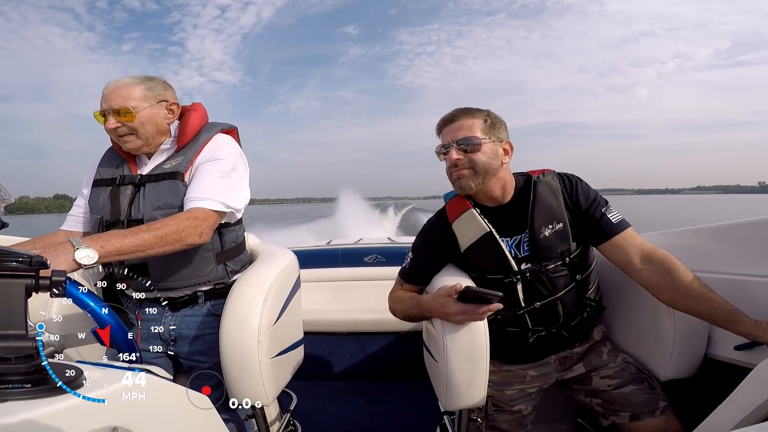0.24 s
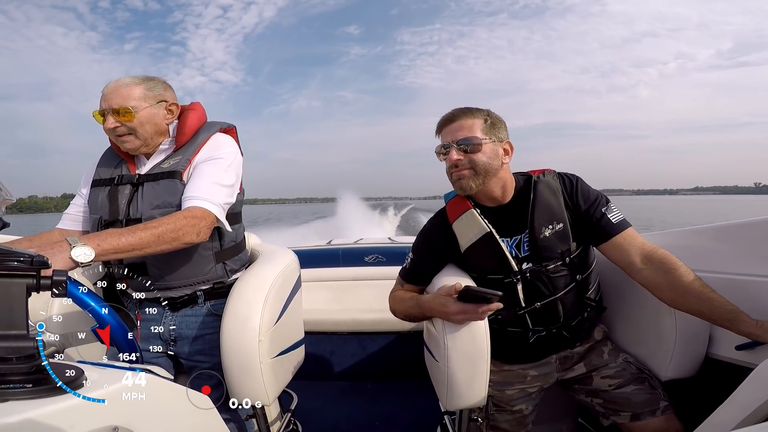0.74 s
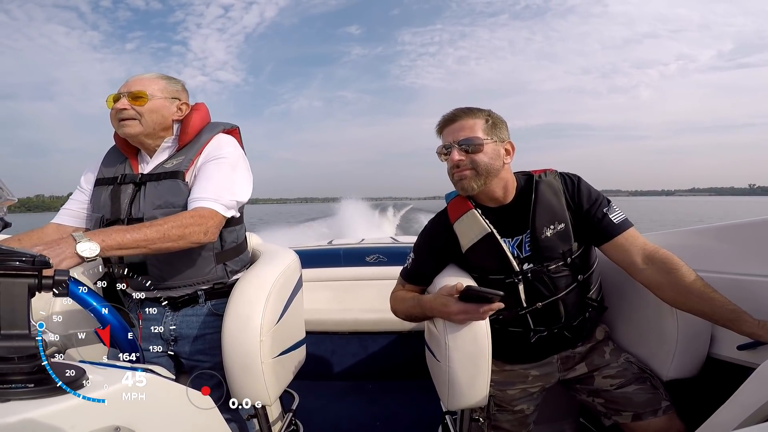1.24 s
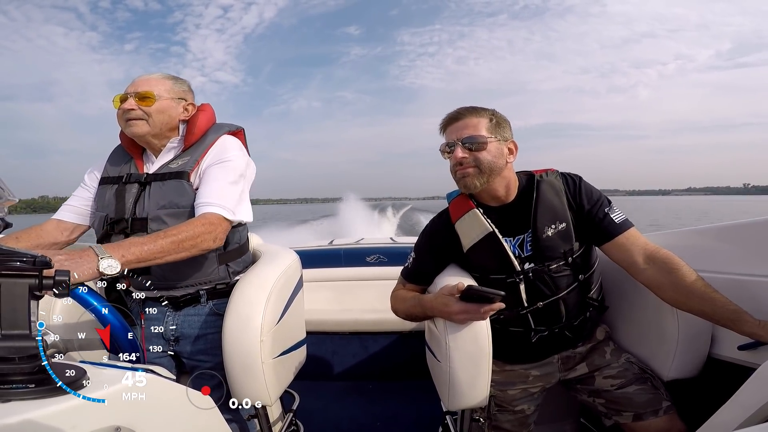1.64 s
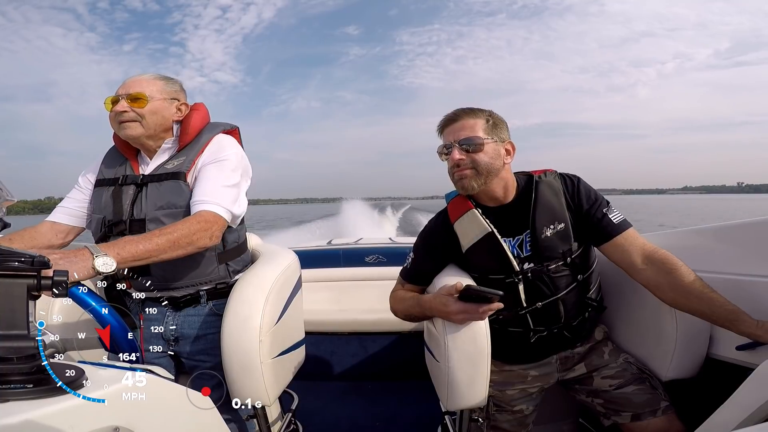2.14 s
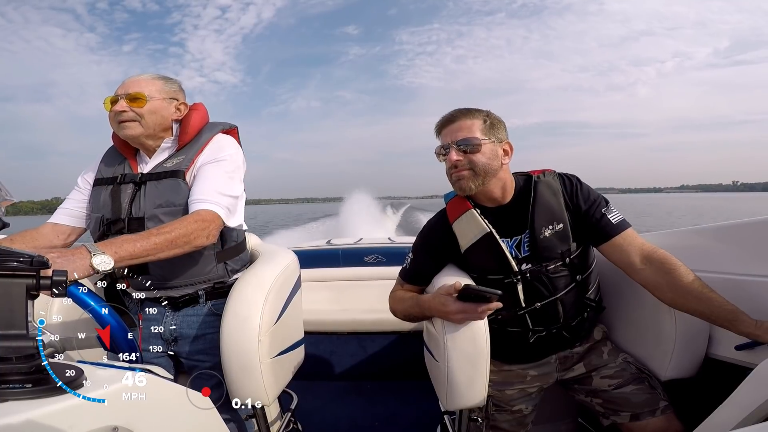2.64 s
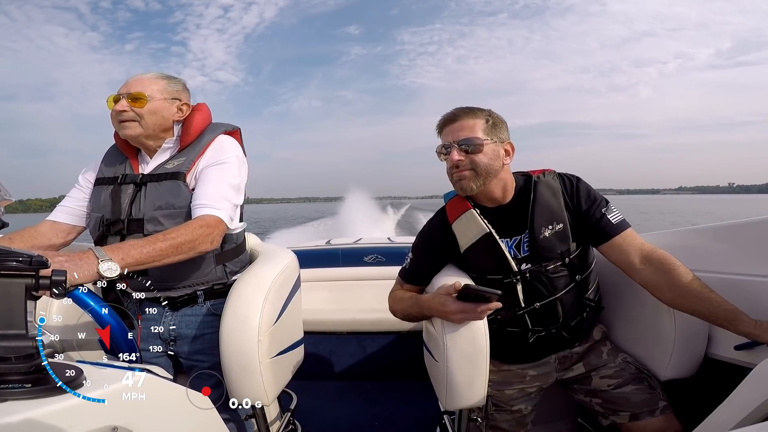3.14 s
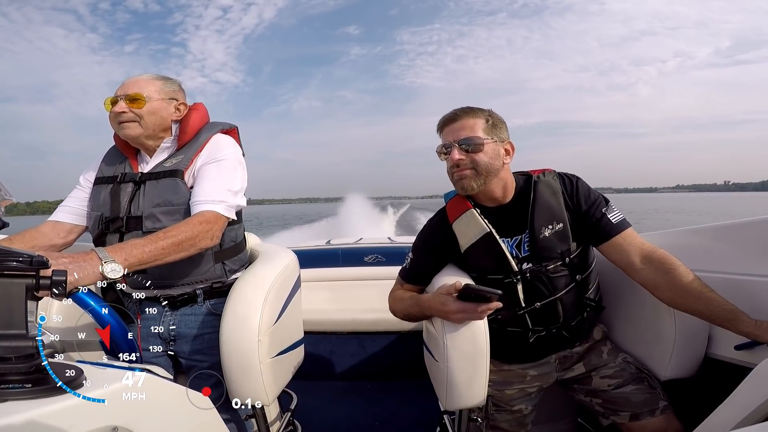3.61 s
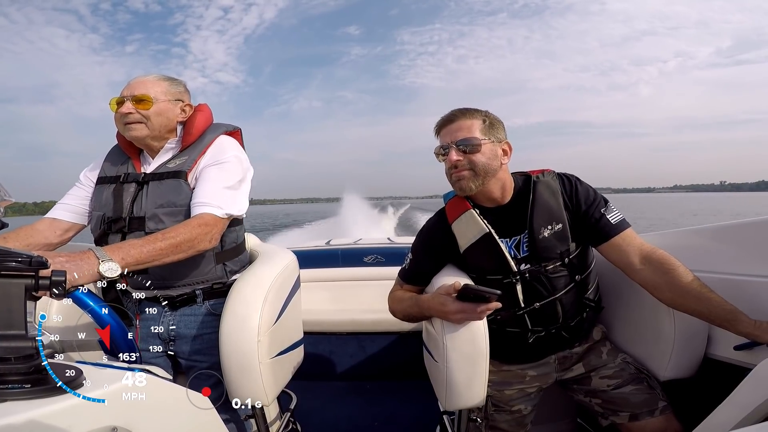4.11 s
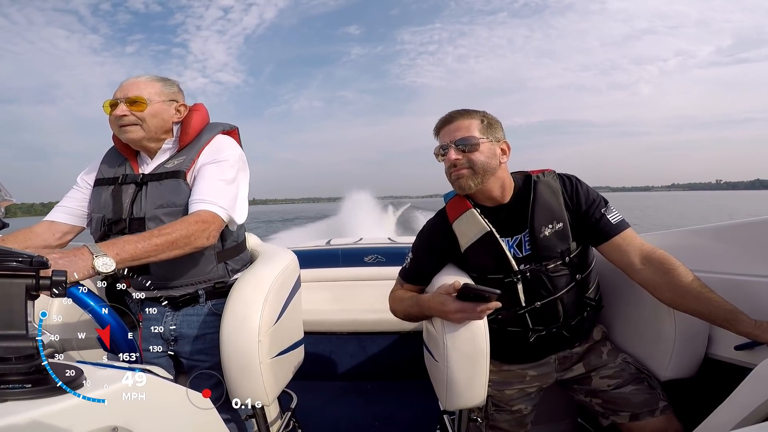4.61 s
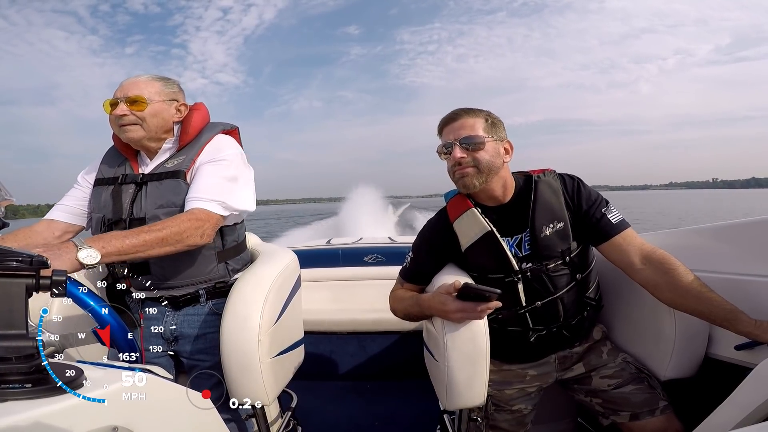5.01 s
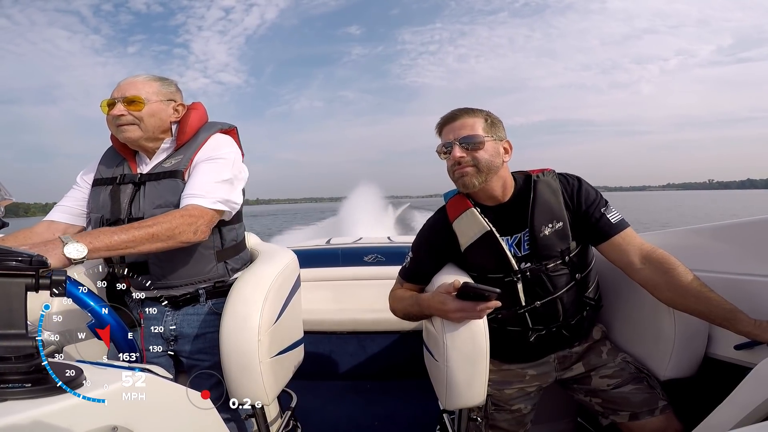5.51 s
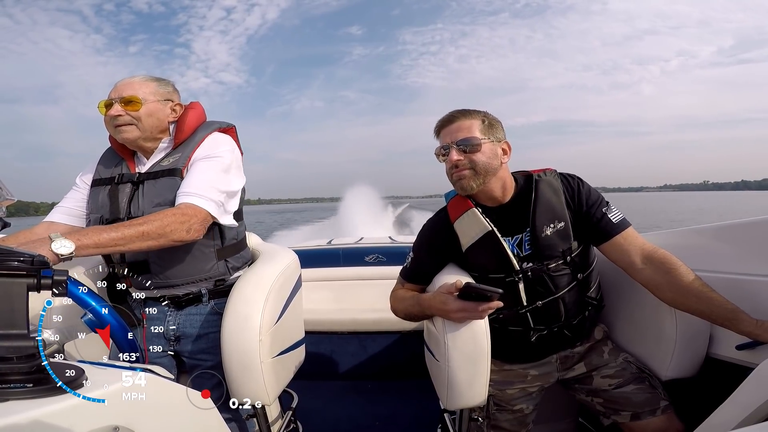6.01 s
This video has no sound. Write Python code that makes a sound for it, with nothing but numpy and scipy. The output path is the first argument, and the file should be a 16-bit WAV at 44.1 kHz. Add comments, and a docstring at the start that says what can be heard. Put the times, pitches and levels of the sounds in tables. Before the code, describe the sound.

From inside a speedboat, a powerful engine runs hard and accelerates twice, with a thin whine, water spray and gusts of wind.

```python
"""In the cockpit of a speedboat on open water, a supercharged V8 is opened up in two steps.
Its droning firing note climbs, then gives way to a deep, ragged exhaust bark. Exhaust, propeller,
blower and belt drive all sound at multiples (orders) of the engine cycle, two turns of the crank.
Turbulent gas roars, the panels ring, and the intake growls at each push of the throttle.
Spray hisses off the hull and wind buffets the microphone."""
import sys
import numpy as np
from scipy import signal
from scipy.fft import rfft, irfft
from scipy.io import wavfile
from scipy.ndimage import uniform_filter1d, minimum_filter1d

SR = 44100
rng = np.random.default_rng(int(sys.argv[2]) if len(sys.argv) > 2 else 0)


def materialize(psi):
    """Save the field psi as 16-bit PCM at rate SR to the path in sys.argv[1].

    A 1-D psi becomes a single channel; in a 2-D psi each row is a channel.
    """
    bounded = np.clip(np.atleast_2d(psi).T, -1, 1)
    quanta = np.round(bounded * 32767).astype(np.int16)
    wavfile.write(sys.argv[1], SR, quanta)


N = 276066
TIME = np.arange(N) / SR
FIRING_ORDER = 8  # firings per engine cycle

# Engine speed: time_s, cycle_rate_hz
ENGINE_SPEED = [(0.0, 26.7), (0.54, 26.5), (0.61, 26.3), (1.13, 26.6), (1.31, 26.4), (1.55, 26.8),
                (1.76, 26.8), (2.0, 28.3), (2.39, 28.7), (2.98, 28.4), (3.16, 28.5), (3.42, 28.3),
                (3.73, 28.7), (4.11, 28.8), (4.34, 31.1), (4.6, 32.3), (5.46, 33.1), (6.26, 33.3)]
# Throttle position: time_s, setting (0 cruise, 1 part, 2 full)
THROTTLE = [(0, 0), (1.74, 0), (1.9, 1), (4.05, 1), (4.35, 1.6), (4.75, 2), (6.26, 2)]
# The flare at each push of the throttle: centre_s, half_width_s, blower_db, intake_db, bite_db
SURGES = [(1.79, .14, -46, -61, -15), (4.38, 0.19, -52, -37, -9)]


def gain_of(db):
    """Amplitude grows tenfold for every 20 dB."""
    return 10 ** (np.asarray(db) / 20)


def unit_rms(x):
    """Normalisation brings a signal to a mean power of 1."""
    return x / np.sqrt(np.mean(x ** 2) + 1e-20)


def curve(rows):
    """Linear interpolation gives a value at every sample from rows of time_s, value."""
    return np.interp(TIME, *np.transpose(rows))


def by_throttle(values):
    """Interpolation follows the throttle through the values for cruise, part and full."""
    return np.interp(curve(THROTTLE), np.arange(len(values)), values)


def swells(rows, column):
    """Gaussian envelopes add; each row opens with centre_s, half_width_s and has peak_db in column."""
    return sum(gain_of(row[column]) * np.exp(-((TIME - row[0]) / row[1]) ** 2) for row in rows)


def wander(rate_hz):
    """Band-limited noise of rms 1 fluctuates at rates up to about rate_hz."""
    oversampling = 4
    smooth = signal.resample_poly(rng.standard_normal(1024), oversampling, 1)
    return unit_rms(np.interp(2 * rate_hz * oversampling * TIME, np.arange(len(smooth)), smooth))


def noise(spectrum):
    """Filtering gives white noise a spectral density, set by rows of frequency_hz, density_db."""
    hz, db = np.transpose(spectrum)
    shape = gain_of(np.interp(np.log(np.fft.rfftfreq(N, 1 / SR) + 1), np.log(hz), db))
    return irfft(rfft(rng.standard_normal(N)) * shape, N) * np.sqrt(SR / 2)


def tone(cycles, order, flutter, rate_hz):
    """Random modulation of amplitude and phase broadens one engine order into a narrow band of rms 1."""
    angle = 2 * np.pi * ((order * cycles + rng.random()) % 1).astype(np.float32)
    in_phase = (1 + flutter * wander(rate_hz)) * np.cos(angle)
    quadrature = flutter * wander(rate_hz) * np.sin(angle)
    return (in_phase + quadrature) * np.sqrt(2 / (1 + 2 * flutter ** 2))


def harmonic_comb(cycles, fall_db_per_octave, above_order):
    """A random waveform repeated every engine cycle has a line spectrum, here ending below order 100."""
    orders = np.arange(2049)
    in_band = (orders > above_order) & (orders < 100)
    comb = in_band * gain_of(-fall_db_per_octave * np.log2(orders + 1))
    phases = np.exp(2j * np.pi * rng.random(len(orders)))
    period = unit_rms(irfft(unit_rms(comb) * phases))
    return np.interp(cycles % 1 * len(period), np.arange(len(period)), period)


def resonate(excitation, modes):
    """Each resonance (pitch_hz, width_hz, level_db) passes a Lorentzian band of the excitation."""
    hz = np.fft.rfftfreq(N, 1 / SR)
    response = sum(gain_of(db) * unit_rms(1 / (1 + (2 * (hz - pitch_hz) / width_hz) ** 2))
                   for pitch_hz, width_hz, db in modes)
    return irfft(rfft(excitation) * response, N)


def throb(cycles, blade_order=20 / 3):
    """Low engine and propeller tones swell and fade as they sweep through pipe and hull resonances."""
    orders = (2, 3, 5, FIRING_ORDER, blade_order)
    # Engine speeds at which the levels are set: cycle_rate_hz
    speeds_hz = (26.5, 27.4, 28.5, 31.2, 33.1)
    # Low tones, one row per order: level_db at each of speeds_hz
    levels = [(-34, -37.5, -27, -21.5, -19.5), (-30.5, -33.5, -31, -34, -33), (-46, -44.5, -38, -25.5, -29),
              (-17, -14, -18, -37, -34.5), (-25.5, -23, -24.5, -25.5, -35.5)]
    speed = curve(ENGINE_SPEED)
    return sum(gain_of(np.interp(speed, speeds_hz, db)) * tone(cycles, order, flutter=0.05, rate_hz=5.1)
               for order, db in zip(orders, levels))


def exhaust(cycles, boom_hz=803, boom_width_hz=17, boom_db=6.5, bite_hz=640, bite_octaves=0.3):
    """Unequal, unevenly spaced cylinder pulses repeat once a cycle, so its harmonics ring in the pipes."""
    # Weaker exhaust harmonics: order, cruise_db, part_db, full_db
    harmonics = [(4, -40, -41, -41), (6, -41, -33, -40), (7, -36, -41, -34), (9, -37, -43, -40),
                 (10, -42, -48, -35.5), (11, -45, -51, -54), (12, -44, -61, -44), (13, -49, -54, -40),
                 (14, -58, -56, -47), (15, -53, -44, -43), (16, -46, -50, -47), (17, -53, -64, -43),
                 (18, -58, -49, -42.5), (19, -56, -49, -48), (20, -53, -49, -52), (21, -51, -58, -54),
                 (22, -58, -55, -57), (23, -72, -67, -50), (24, -52, -53, -49), (25, -58, -59, -50),
                 (26, -54, -54, -55), (27, -60, -54, -57), (28, -66, -48.5, -57), (33, -65, -62, -53),
                 (34, -72, -60, -51), (36, -52, -51, -55), (38, -74, -62, -53), (39, -70, -69, -50),
                 (42, -63, -68, -56), (44, -60, -65, -53), (45, -58, -70, -66), (48, -58, -64, -68),
                 (50, -64, -57, -63)]
    speed = curve(ENGINE_SPEED)
    flutter_per_order = by_throttle((0.012, 0.0059, 0.0046))
    surge = swells(SURGES, column=4)
    pipes = np.zeros(N)
    for order, *levels_db in harmonics:
        hz = order * speed
        # The engine cover booms whenever a harmonic slides across its resonance.
        boom = 1 + (gain_of(boom_db) - 1) / (1 + (2 * (hz - boom_hz) / boom_width_hz) ** 2)
        bite = 1 + surge * np.exp(-(np.log2(hz / bite_hz) / bite_octaves) ** 2)
        partial = tone(cycles, order, order * flutter_per_order, rate_hz=12)
        pipes += by_throttle(gain_of(levels_db)) * boom * bite * partial
    return pipes


def rasp(cycles, levels_db=(-51, -53, -47)):
    """Periodic valve strokes and gas pulses make a fine buzz of closely spaced high harmonics."""
    buzz = harmonic_comb(cycles, fall_db_per_octave=10.5, above_order=36)
    return by_throttle(gain_of(levels_db)) * buzz


def blower(cycles, orders=(32, 64), overtone_flare_db=-12.5):
    """Supercharger rotors pulse the air periodically: a whine and its octave flare at each push."""
    # Rotor tones, one row per order: cruise_db, part_db, full_db
    levels = [(-53, -54, -56), (-62.5, -58.5, -56)]
    surge = swells(SURGES, column=2)
    flares = (surge, surge * gain_of(overtone_flare_db))
    return sum((by_throttle(gain_of(db)) + flare) * tone(cycles, order, flutter=0.25, rate_hz=12)
               for order, db, flare in zip(orders, levels, flares))


def propeller_and_belt(cycles, orders=(40 / 3, 25.2, 113.6)):
    """The propeller's overtone (twice the blade rate) and two belt-drive whines follow engine speed."""
    # Propeller overtone, then the two belt-drive whines: cruise_db, part_db, full_db
    levels = [(-48.5, -57.5, -48), (-54, -54.5, -52), (-62.5, -76, -72)]
    return sum(by_throttle(gain_of(db)) * tone(cycles, order, flutter=0.28, rate_hz=16)
               for order, db in zip(orders, levels))


def roar(cycles, puff_depth=0.18, lope_depth=0.036, gains_db=(2, 2, 1.3)):
    """Turbulent gas makes broadband noise, amplitude-modulated by each firing and each engine cycle."""
    # Exhaust and hull noise at cruise and at full throttle: frequency_hz, relative_density_db
    cruise_spectrum = [(20, -75), (60, -56), (110, -58), (150, -54.5), (200, -53.5), (300, -62.5),
                       (430, -72.5), (750, -71.5), (1000, -76.5), (1400, -75), (1650, -81), (2000, -79.5),
                       (2700, -92), (3600, -99), (9000, -135)]
    full_spectrum = [(20, -70), (60, -48), (110, -50), (150, -55.5), (200, -54.5), (300, -62.5), (450, -64),
                     (800, -69), (1000, -71), (1400, -71), (1650, -82), (2000, -78), (2700, -86),
                     (3600, -89.5), (9000, -130)]
    full_share = by_throttle([0, 0.15, 1]).clip(0, 1)
    gas = np.sqrt(1 - full_share) * noise(cruise_spectrum) + np.sqrt(full_share) * noise(full_spectrum)
    puffs = puff_depth * np.cos(2 * np.pi * FIRING_ORDER * cycles)
    lope = lope_depth * np.cos(2 * np.pi * cycles)
    return gas * (1 + puffs + lope) * by_throttle(gain_of(gains_db))


def panels():
    """Forced vibration rings the engine cover and hull at their natural frequencies."""
    # Narrow panel resonances: pitch_hz, width_hz, cruise_db, part_db, full_db
    modes = [(344, 37, -49, -53.5, -54), (824, 43, -67, -57.5, -58), (1418, 40, -61, -57, -56),
             (1860, 82, -62.5, -60.5, -55), (3013, 54, -67.5, -68, -64)]
    shaking = rng.standard_normal(N)
    return sum(by_throttle(gain_of(levels_db)) * resonate(shaking, [(pitch_hz, width_hz, 0)])
               for pitch_hz, width_hz, *levels_db in modes)


def spray(base_db=(-41, -45.5, -43.5), growth_db_per_s=0.76, swell_db=0.25, patter_depth=0.071):
    """Drops thrown off the hull add incoherently to a hiss that darkens, then grows with boat speed."""
    # Spray at cruise and from part throttle upward: frequency_hz, relative_density_db
    cruise_spectrum = [(2800, -16), (3600, -21), (4000, -15), (4600, -7.5), (5000, -1.5), (5700, -7.5),
                       (6300, -0.5), (6800, -3.5), (7400, -11), (8700, -18), (10000, -26), (11000, -30),
                       (12500, -37), (13700, -49)]
    fast_spectrum = [(2800, -21), (3600, -17.5), (4000, -8), (4600, -2.5), (5000, 1.5), (5700, -3),
                     (6300, 0), (6800, -4), (7400, -9), (8700, -16.5), (10000, -24.5), (11000, -28),
                     (12500, -40.5), (13700, -50.5)]
    throttle = curve(THROTTLE)
    fast_share = throttle.clip(0, 1)
    hiss = np.sqrt(1 - fast_share) * unit_rms(noise(cruise_spectrum))
    hiss += np.sqrt(fast_share) * unit_rms(noise(fast_spectrum))
    full_throttle_s = np.cumsum((throttle - 1).clip(0, 1)) / SR
    level_db = by_throttle(base_db) + growth_db_per_s * full_throttle_s + swell_db * wander(1.4)
    return gain_of(level_db) * hiss * (1 + patter_depth * wander(30))


def wind(breeze_db=-46):
    """Turbulent pressure on the microphone rumbles in gusts over a steady breeze."""
    # Wind rumble: frequency_hz, relative_density_db
    spectrum = [(8, -38), (20, -7.5), (32, 3.5), (45, -5), (70, -4), (140, -22), (400, -60.5)]
    # Gusts: centre_s, half_width_s, peak_db
    gusts = [(0.3, 0.6, -42.5), (2.95, .33, -36.5), (4.25, 0.7, -39.5), (5.6, 0.32, -37), (6.26, 0.39, -35)]
    return (gain_of(breeze_db) + swells(gusts, column=2)) * unit_rms(noise(spectrum))


def intake(cycles):
    """Suction strokes and rushing air excite the intake's resonances while the engine leaps in speed."""
    # Intake resonances: pitch_hz, width_hz, relative_level_db
    modes = [(613, 58, -11.5), (804, 89, 2.5), (1350, 200, -3.5), (1860, 150, -8.5)]
    strokes = harmonic_comb(cycles, fall_db_per_octave=0, above_order=16)
    rushing_air = rng.standard_normal(N)
    return swells(SURGES, column=3) * unit_rms(resonate(strokes + rushing_air, modes))


def bass_dip(sound, cutoff_hz=120):
    """Partial cancellation by a low-passed copy thins the bass briefly after the first push."""
    # Dip in the bass: centre_s, half_width_s, removed_share_db
    dips = [(2.0, .24, -7)]
    bass = signal.sosfiltfilt(signal.butter(4, cutoff_hz, fs=SR, output="sos"), sound)
    return sound - swells(dips, column=2) * bass


def scene(speed_jitter=0.00076):
    """The sources add by superposition; one phase, the integral of engine speed, drives every tone."""
    cycles = np.cumsum(curve(ENGINE_SPEED) * (1 + speed_jitter * wander(8))) / SR
    engine = throb(cycles) + exhaust(cycles) + rasp(cycles)
    whine = blower(cycles) + propeller_and_belt(cycles)
    gas_flow = roar(cycles) + intake(cycles)
    return bass_dip(engine + whine + gas_flow + panels() + spray() + wind())[None]


def record(dry, ceiling_db=-8.5, window_samples=900, cutoff_hz=14000):
    """A limiter eases the gain down around peaks; short fades and a low-pass filter follow."""
    allowed_gain = np.minimum(1, gain_of(ceiling_db) / (abs(dry) + 1e-9))
    smooth_gain = uniform_filter1d(minimum_filter1d(allowed_gain, window_samples), window_samples)
    faded = dry * smooth_gain * signal.windows.tukey(N, 0.002)
    low_pass = signal.firwin(255, cutoff_hz, window=("kaiser", 9), fs=SR)
    return signal.oaconvolve(faded, low_pass[None], "same")


dry = scene()
out = record(dry)
materialize(out)
```